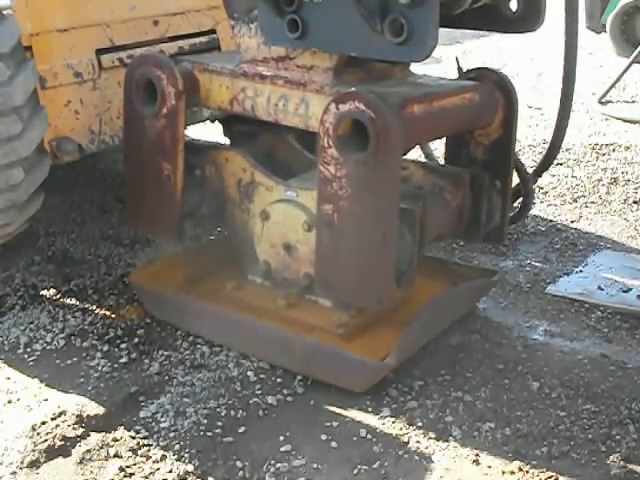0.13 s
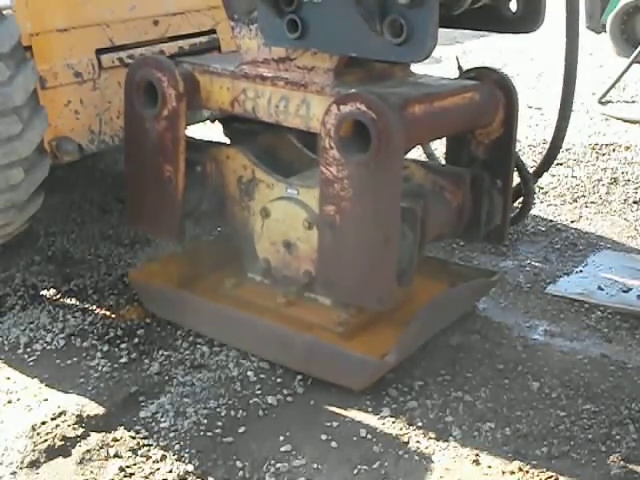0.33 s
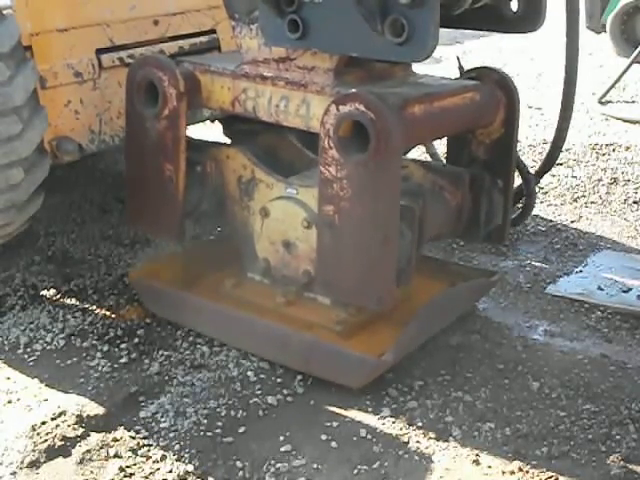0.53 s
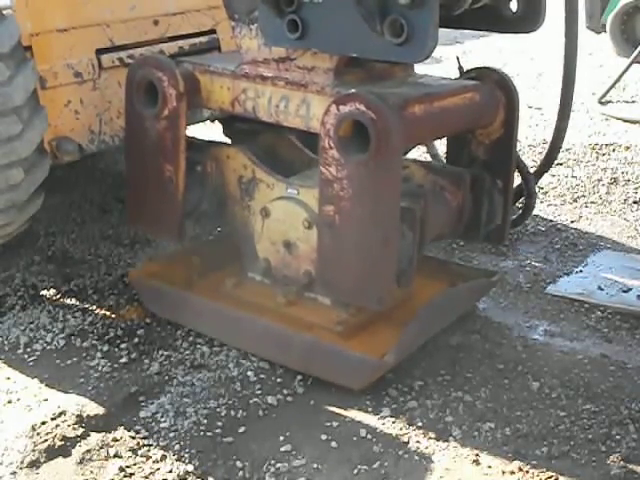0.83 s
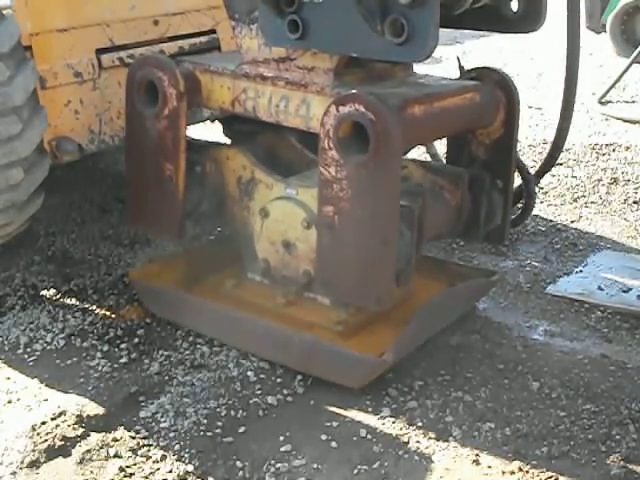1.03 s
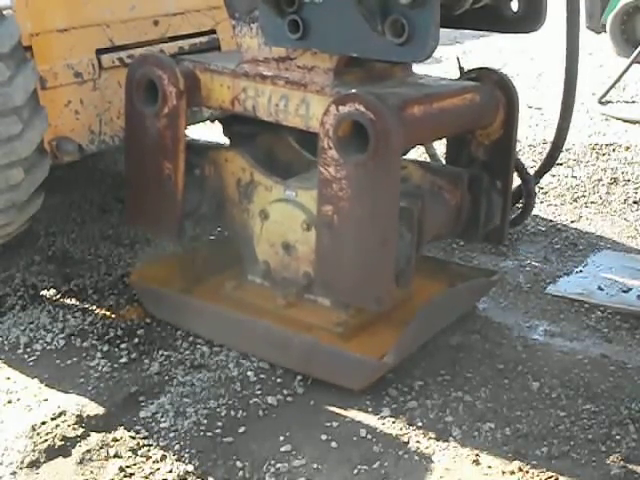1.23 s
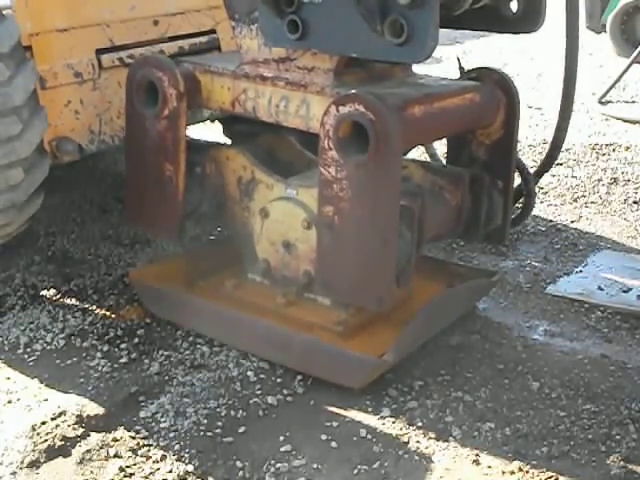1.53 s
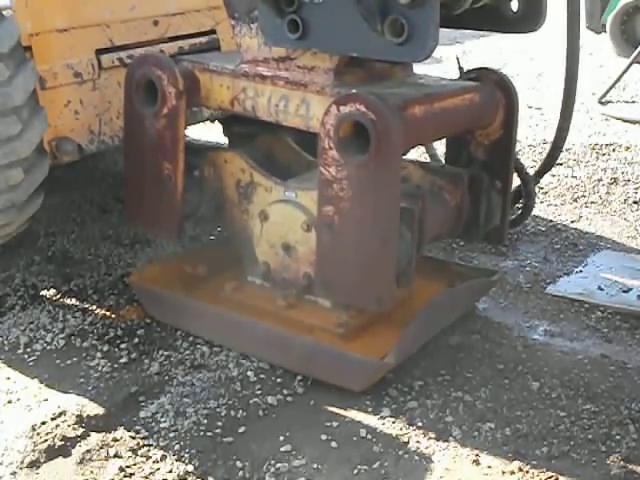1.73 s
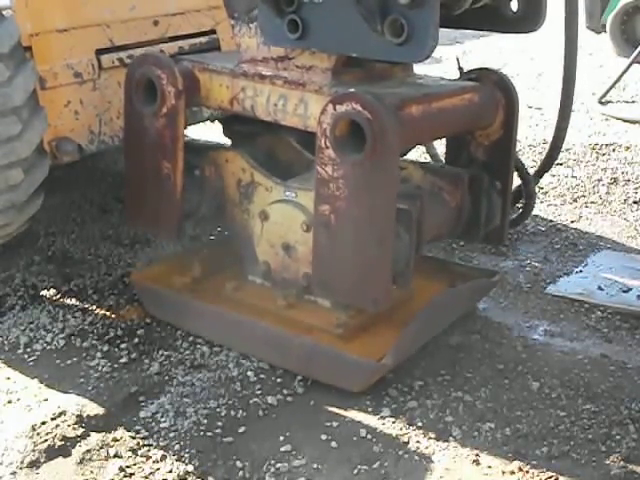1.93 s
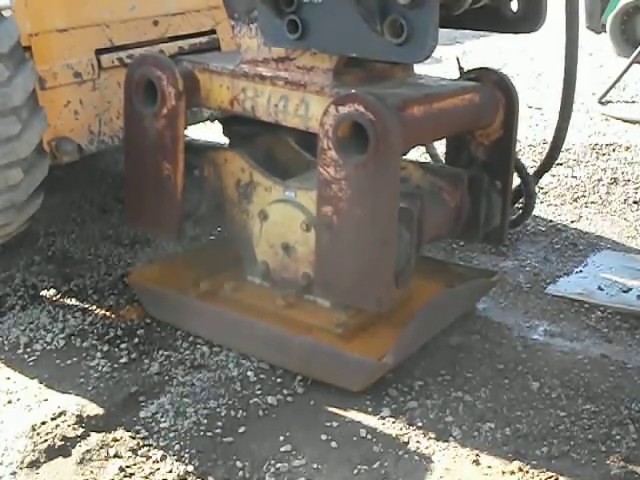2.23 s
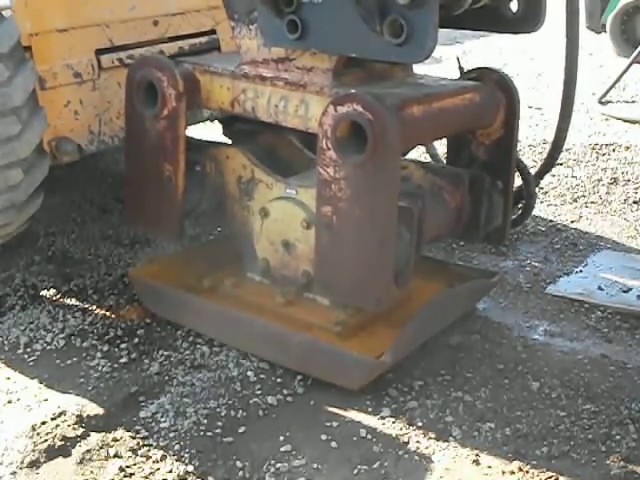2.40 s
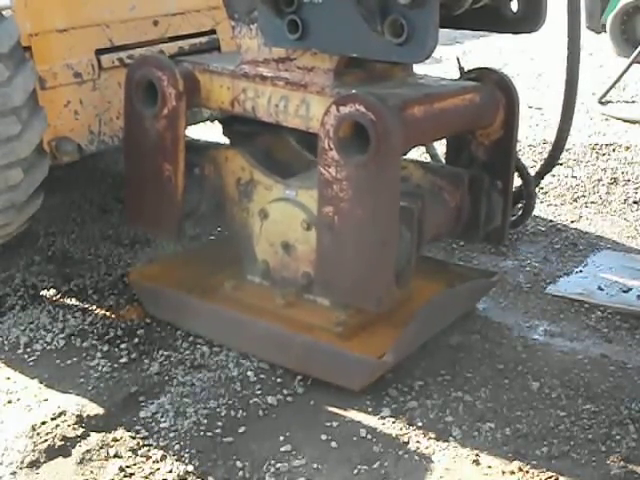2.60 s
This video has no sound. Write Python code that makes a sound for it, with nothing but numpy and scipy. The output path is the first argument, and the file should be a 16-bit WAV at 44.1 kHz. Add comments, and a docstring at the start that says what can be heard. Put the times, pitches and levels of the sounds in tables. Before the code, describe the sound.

A vibrating plate compactor runs from start to end, shaking about sixteen times a second. Irregular bursts of crushed stone and steel clatter mingle with heavy knocks and short rings. Hard cracks jump out near 0.05, 0.55, 1.24, 1.7, 1.8, 2.2, 2.43 and 2.55 seconds. Uneven ground rumble, engine drone and faint hum continue below. Open yard, weak short echoes, dull close microphone clipping on peaks.

```python
"""A hydraulic plate compactor shakes on gravel in an open yard, about sixteen strokes a second, from start to end.
Each stroke bunches random clicks into a burst of crushed stone and steel clatter; the heavy plate knocks and rings.
Single hard cracks of damped modes stand out from the first strokes until shortly before the end.
Under it all, noise makes the ground's rumble, and unsteady sines the shaker's beat, the engine's drone and a hum.
The small microphone is dull and overloads on the hardest peaks."""
import sys
import numpy as np
from scipy import signal
from scipy.fft import rfft, irfft
from scipy.io import wavfile
from scipy.ndimage import uniform_filter1d

SR = 44100
rng = np.random.default_rng(int(sys.argv[2]) if len(sys.argv) > 2 else 0)


def transcribe(signal):
    """Save signal, clipped to [-1, 1], as a 16-bit WAV file at the path in sys.argv[1]."""
    frames = np.atleast_2d(signal).T
    limited = np.clip(frames, -1, 1)
    pcm = np.round(limited * 32767).astype(np.int16)
    wavfile.write(sys.argv[1], SR, pcm)


N = 121716
TIME = np.arange(N) / SR
FREQS = np.maximum(np.fft.rfftfreq(N, 1 / SR), 1)

# edges of the low, middle and high treble in which stones and steel clatter [f/Hz]
CLATTER_EDGES_HZ = [1450, 2600, 4100, 6400]
SHAKER_HZ, SHAKER_WANDER = 16.1, 0.011   # stroke rate, and its unsteadiness as a share
ENGINE_WANDER = 0.0059   # unsteadiness of engine and hum, as a share of their pitch


def from_db(db):
    """Decibels to gain."""
    return 10 ** (np.asarray(db) / 20)


def rms_one(x):
    """Scale to unit rms."""
    return x / np.sqrt(np.mean(x ** 2) + 1e-20)


def drift(hz):
    """Smooth random wandering with rms 1, mostly slower than hz."""
    smoothing = (1 + (FREQS / hz) ** 2) ** 2
    return rms_one(irfft(rfft(rng.standard_normal(N)) / smoothing, N))


def colour(x, spectrum, low, high):
    """Give a steady source a spectrum between two steep edges; rms 1."""
    hz, db = np.transpose(spectrum)
    edges = ((1 + (low / FREQS) ** 24) * (1 + (FREQS / high) ** 24)) ** -.5
    tint = from_db(np.interp(np.log(FREQS), np.log(hz), db))
    return rms_one(irfft(rfft(x) * edges * tint, N))


def contacts(per_s, spread_db):
    """Clicks at random times with random signs; a spread other than zero makes their sizes uneven."""
    sizes = from_db(spread_db * np.minimum(rng.exponential(1, N), 4))
    signs = rng.choice([-1, 1], N)
    return sizes * signs * (rng.random(N) < per_s / SR)


def even(x, span_s):
    """Level out slow swells, keeping the fine grain."""
    power = uniform_filter1d(x ** 2, max(int(span_s * SR), 2))
    return x / np.sqrt(power + 1e-6)


def pressure(rows, zone, attack_s, hold_s, floor_db):
    """Attack, hold and decay of every stroke, summed as power over a steady floor."""
    power = np.full(N, from_db(floor_db) ** 2)
    for s, decay_s, *db in rows:
        age = TIME - s
        attack = np.clip(age / attack_s, 0, 1)
        decay = np.exp(-np.maximum(age - hold_s, 0) / decay_s)
        power += (from_db(db[zone]) * attack * decay) ** 2
    return np.sqrt(power)


def rotor(hz, orders, wander, flutter_db):
    """Sines on multiples of a slightly unsteady speed, each fluttering in level."""
    phase = 2 * np.pi * np.cumsum(hz * (1 + wander * drift(4))) / SR
    out = 0
    for multiple, db in orders:
        level = from_db(db + flutter_db * drift(12))
        out = out + np.sqrt(2) * level * np.sin(multiple * phase + rng.uniform(0, 2 * np.pi))
    return out


def clatter():
    """Dense sharp contacts of stone and steel, bunched by the strokes, with grinding in between."""
    # bursts, before the layer gain: [t/s, decay/s, low, middle and high treble level/dB]
    bursts = [(0.0141, 0.06, -24.5, -24, -26.5), (0.0361, 0.041, -20, -17.5, -28.5),
              (0.1, 0.02, -19.5, -20.5, -27), (0.1173, 0.006, -20.5, -23.5, -19.5),
              (0.162, 0.049, -19, -19, -30), (0.179, 0.032, -37, -33.5, -24.5),
              (0.2561, 0.013, -26, -20, -27), (0.3, 0.027, -23.5, -20, -25.5),
              (0.4135, 0.042, -25.5, -23.5, -33), (0.439, 0.03, -26.5, -19, -26),
              (0.545, 0.031, -23.5, -20, -27), (0.608, 0.017, -21, -20.5, -21),
              (0.6708, 0.047, -21.5, -21, -29.5), (0.757, 0.035, -28, -29.5, -29),
              (0.789, 0.02, -18.5, -17.5, -24), (0.8587, 0.013, -25, -17, -21.5),
              (0.911, 0.034, -21, -22.5, -28), (0.9898, 0.0082, -28, -21.5, -25.5),
              (1.048, 0.01, -35, -23.5, -34), (1.103, 0.021, -24, -22, -26.5),
              (1.167, 0.073, -24.5, -24, -34), (1.228, 0.0081, -19.5, -14, -13.5),
              (1.294, 0.043, -23.5, -27.5, -29.5), (1.3473, 0.092, -28.5, -23, -42),
              (1.408, 0.022, -20, -21.5, -20.5), (1.483, 0.025, -24, -20.5, -22.5),
              (1.525, 0.077, -29, -26.5, -33.5), (1.551, 0.055, -22, -23.5, -32),
              (1.6246, 0.056, -23, -25, -27), (1.669, 0.056, -27, -18.5, -42),
              (1.7228, 0.036, -26.5, -20.5, -25.5), (1.7608, 0.032, -25, -20.5, -26),
              (1.783, 0.043, -17.5, -24.5, -27.5), (1.8, 0.0035, -17.5, -19, -23),
              (1.9145, 0.026, -23, -19.5, -27), (1.9841, 0.0049, -51, -19.5, -23.5),
              (2.1082, 0.023, -24, -20.5, -25), (2.1832, 0.037, -24, -22, -31.5),
              (2.2393, 0.033, -25.5, -23, -26.5), (2.2629, 0.019, -30, -20.5, -23),
              (2.297, 0.02, -19, -18, -33), (2.3693, 0.022, -25, -19.5, -25),
              (2.4206, 0.013, -24.5, -16.5, -28), (2.4796, 0.018, -24.5, -17.5, -24),
              (2.5454, 0.0087, -17, -14, -19.5), (2.6025, 0.038, -23.5, -21.5, -27.5),
              (2.7303, 0.017, -19, -17.5, -23.5)]
    # grinding between bursts, before the layer gain, one per treble zone [level/dB]
    grind_db = [-32, -30.5, -41]
    # tone of the crushed stones [f/Hz, level/dB per Hz]
    stones = [(1400, 4), (1600, 3.5), (1780, -1.5), (2000, 3.5), (2400, -5.5), (2950, 0), (3300, -1.5),
              (3650, -1), (4150, -5.5), (4550, 0.5), (5000, -1), (5250, -4.5), (5500, -15.5), (5900, -18.5),
              (6300, -37.5)]
    clicks = shifting(contacts(per_s=2600, spread_db=0))
    out = 0
    for zone, floor_db in enumerate(grind_db):
        low, high = CLATTER_EDGES_HZ[zone], CLATTER_EDGES_HZ[zone + 1]
        grain = even(colour(clicks, stones, low, high), span_s=.012)
        out = out + grain * pressure(bursts, zone, attack_s=0.0045, hold_s=0.0069, floor_db=floor_db)
    return from_db(-1.06) * out   # layer gain


def shifting(x):
    """Narrow resonances across the treble come and go with the stones and loose parts that touch."""
    width_hz, swing_db, change_hz = 110, 2, 23.6
    spectrum, out = rfft(x), 0
    for hz in np.linspace(CLATTER_EDGES_HZ[0], CLATTER_EDGES_HZ[-1], 26):
        part = irfft(spectrum * np.exp(-((FREQS - hz) / width_hz) ** 2), N)
        out = out + part * from_db(swing_db * np.clip(drift(change_hz), -2, 2))
    return out


def knocks():
    """Fewer, heavier contacts of the plate and its frame, with judder in between."""
    # blows, before the layer gain: [t/s, decay/s, thud level/dB, clang level/dB]
    blows = [(0.006, 0.16, -23.5, -20), (0.041, 0.11, -26, -19.5), (0.1669, 0.066, -25, -25.5),
             (0.2584, 0.0082, -22.5, -16.5), (0.3203, 0.0085, -22, -18.5), (0.3717, 0.034, -21, -22.5),
             (0.4403, 0.033, -19, -22), (0.512, 0.014, -23, -23.5), (0.549, 0.16, -22.5, -22.5),
             (0.625, 0.022, -22, -19), (0.688, 0.025, -18.5, -21.5), (0.7552, 0.14, -27, -18),
             (0.811, 0.026, -19, -27), (0.9246, 0.042, -26.5, -18.5), (0.989, 0.0044, -19, -27),
             (1.111, 0.018, -26, -21.5), (1.172, 0.087, -21.5, -20.5), (1.2379, 0.0047, -25, -18.5),
             (1.2993, 0.032, -19.5, -19.5), (1.3769, 0.024, -18.5, -17.5), (1.4431, 0.11, -23.5, -31),
             (1.626, 0.085, -21.5, -21.5), (1.684, 0.015, -18, -18.5), (1.749, 0.075, -23.5, -22.5),
             (1.799, 0.053, -22.5, -18.5), (1.9267, 0.032, -21.5, -17.5), (1.984, 0.017, -23.5, -26),
             (2.1143, 0.016, -20, -26), (2.1785, 0.033, -17.5, -19.5), (2.2995, 0.033, -24.5, -19.5),
             (2.424, 0.048, -21, -20), (2.494, 0.02, -22.5, -19.5), (2.5481, 0.05, -23.5, -22),
             (2.608, 0.063, -24, -18.5), (2.7383, 0.007, -20, -18.5)]
    # edges of the thud and clang zones [f/Hz]
    edges_hz = [280, 760, 1450]
    # judder between blows, before the layer gain, one per zone [level/dB]
    judder_db = [-29, -25]
    # tone of the heavy plate [f/Hz, level/dB per Hz]
    plate = [(250, 1), (320, -2.5), (400, -2), (480, 0), (620, 3), (760, -6.5), (900, 2.5), (1090, 0),
             (1200, -8), (1370, -3), (1550, -19)]
    clicks = contacts(per_s=1200, spread_db=-0.5)
    out = 0
    for zone, floor_db in enumerate(judder_db):
        grain = even(colour(clicks, plate, edges_hz[zone], edges_hz[zone + 1]), span_s=.018)
        out = out + grain * pressure(blows, zone, attack_s=.003, hold_s=0.014, floor_db=floor_db)
    return from_db(-0.89) * out   # layer gain


def steel(force):
    """The contacts, and the two-pole modes of the steel that they set ringing."""
    # modes of the steel [f/Hz, width/Hz, level against the contacts/dB]
    modes = [(370, 18, 4), (674, 44, -10), (945, 9, -0.5), (1107, 8.2, -3), (1358, 19, -4.5),
             (2010, 23, -16), (2930, 11, -2.5), (3114, 32, -1), (3540, 25, -4), (3685, 41, 4.5),
             (4660, 26, -13.5)]
    swing_db = 2.5   # the favoured modes keep changing
    out = force.copy()
    for hz, width_hz, db in modes:
        r = np.exp(-np.pi * width_hz / SR)
        drive = force * from_db(swing_db * drift(3.6))
        poles = [1, -2 * r * np.cos(2 * np.pi * hz / SR), r * r]
        out += from_db(db) * (1 - r * r) / 2 * signal.lfilter([1, 0, -1], poles, drive)
    return from_db(-1.5) * out   # gain of contacts and modes together


def cracks():
    """One hard blow of steel on steel starts several heavily damped modes at once."""
    # single blows [t/s, peak level/dB]
    hard_blows = [(0.0479, -2.5), (.5517, -7), (1.2413, -3.5), (1.2499, -11), (1.6938, -6), (1.804, -7),
                  (2.1845, -10), (2.4337, -6), (2.5517, -7)]
    # damped modes [f/Hz, level/dB]
    crack_modes = [(760, -6.5), (1080, -9), (3150, -15.5)]
    t60_s = 0.0088
    clicks, out = np.full(N, 1e-18), 0
    for s, db in hard_blows:
        clicks[int(s * SR)] = from_db(db)
    r = from_db(-60 / (t60_s * SR))
    for hz, db in crack_modes:
        w = 2 * np.pi * hz / SR
        mode = signal.lfilter([1, -r * np.cos(w)], [1, -2 * r * np.cos(w), r * r], clicks)
        out = out + from_db(db) * mode
    return out


def rings():
    """A mode swells under the chatter of one stroke, then dies; low modes ring longest."""
    # strokes that catch one mode of the steel and make it sing out [t/s, f/Hz, level/dB]
    sung_modes = [(0.051, 945, -14.5), (.775, 4480, -23.5), (0.249, 951, -23), (.435, 942, -17),
                  (.508, 379, -24), (.549, 4580, -18.5), (.622, 360.6, -24.5), (.625, 945, -21),
                  (.69, 951, -21.5), (0.804, 926, -22), (.913, 1970, -24.5), (0.951, 942, -17),
                  (1.167, 1964, -20.5), (1.167, 3710, -23), (1.229, 4893, -23.5), (1.3, 1033, -22.5),
                  (1.405, 3605, -18), (1.42, 392, -25.5), (1.56, 355, -21.5), (1.575, 3687, -21.5),
                  (1.677, 608, -21.5), (1.7, 3714, -20.5), (1.79, 3700, -21), (1.797, 1018, -19.5),
                  (1.915, 355, -28.5), (2.05, 376, -24.5), (2.179, 368, -25.5), (2.19, 939, -16.5),
                  (2.299, 1956, -25.5), (2.3, 934.5, -18.5), (2.42, 1017, -19), (2.426, 385, -24),
                  (2.483, 3610, -20.5), (2.548, 3560, -14), (2.69, 366, -23.5), (2.732, 4548, -23)]
    decay_s, decay_slope = 0.04, 0.67   # decay up to 1 kHz; how much sooner higher modes die
    rise_share = 0.24   # rise time as a share of the decay
    waver = 2 * np.pi * np.cumsum(5.88 * drift(40)) / SR   # pitch wavers by 5.88 Hz rms
    out = 0
    for s, hz, db in sung_modes:
        age = (TIME - s) / (decay_s * min(1000 / hz, 1) ** decay_slope)   # in decay times
        level = np.clip(age / rise_share, 0, 1) * np.exp(-np.maximum(age - rise_share, 0))
        out = out + np.sqrt(2) * from_db(db) * level * np.sin(2 * np.pi * hz * TIME + waver)
    return out


def yard(x):
    """Adds a few weak, short echoes."""
    # echoes off the carrier and the yard [delay t/s, level/dB]
    echoes = [(0.0118, -22), (.023, -21), (.041, -15)]
    return x + sum(from_db(db) * np.interp(TIME - s, TIME, x, left=0) for s, db in echoes)


def rumble(shaking_db):
    """The ground shakes in lumps under the plate: low noise with an uneven level."""
    # tone of the shaking ground [f/Hz, level/dB per Hz]
    ground_tone = [(25, -12), (50, -10.5), (100, -5), (130, -3), (200, -6), (300, -10.5)]
    ground = even(colour(rng.standard_normal(N), ground_tone, 22, 290), span_s=0.081)
    lumps_db = 1.65 * drift(25)
    return ground * from_db(-4.5 + shaking_db + lumps_db)


def shaker():
    """The stroke rate itself, heard as low multiples of its speed."""
    # tones before the swell [multiple of the stroke rate, level/dB]
    shaker_tones = [(1, -48), (3, -46), (4, -44), (7, -45), (8, -46)]
    return rotor(SHAKER_HZ, shaker_tones, SHAKER_WANDER, flutter_db=2.0)


def bounce():
    """The plate bounces at about twice the shaker's speed."""
    return rotor(SHAKER_HZ, [(2, -38)], SHAKER_WANDER, flutter_db=4.3)


def engine():
    """The carrier's engine drones on multiples of its firing rate of about 74.6 Hz."""
    # tones before the swell [multiple of the firing rate, level/dB]
    engine_tones = [(1, -31), (1.5, -42), (2.5, -47)]
    return rotor(74.6, engine_tones, ENGINE_WANDER, flutter_db=2.5)


def hum():
    """One quiet, slightly unsteady tone near 244 Hz."""
    return rotor(244.246, [(1, -43.5)], ENGINE_WANDER, flutter_db=1.5)


def scene():
    """Compactor, ground, engine and hum; rumble, shaker, bounce and engine swell and sink together."""
    # how hard the ground shakes, before the rumble's own gain [t/s, level/dB]
    shaking_course = [(0, -27), (.17, -27.5), (.36, -26), (.44, -31.5), (.57, -27.5), (.65, -30.5),
                      (.71, -27), (.8, -28.5), (.88, -25.5), (1.0, -28), (1.09, -25), (1.18, -29),
                      (1.35, -24.5), (1.48, -30.5), (1.78, -29), (1.88, -25.5), (2.54, -26.5), (2.7, -25.5)]
    shaking_db = np.interp(TIME, *np.transpose(shaking_course))
    swell = from_db(1.1 * (shaking_db - shaking_db.mean()))
    rattle = yard(steel(clatter() + knocks()) + cracks()) + rings()
    # squared swell: the plate bounces far more when the ground shakes hard
    bass = rumble(shaking_db) + swell * (shaker() + engine()) + swell ** 2 * bounce()
    return (rattle + bass + hum())[None]


def record(dry):
    """A dull microphone squashes the hardest peaks; the top of what the squashing adds is cut."""
    dull_hz, cutoff_hz = 6080, 15900
    ceiling, knee = 0.78, 30   # overload level, and how sharply it is reached
    dull = signal.sosfilt(signal.ellip(10, .2, 80, dull_hz, fs=SR, output="sos"), dry)
    squashed = dull / (1 + np.abs(dull / ceiling) ** (2 * knee)) ** (.5 / knee)
    return signal.sosfilt(signal.ellip(10, .2, 80, cutoff_hz, fs=SR, output="sos"), squashed)


dry = scene()
out = record(dry)
transcribe(out)
```